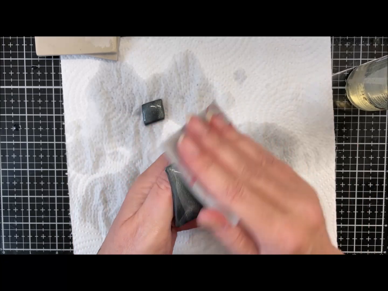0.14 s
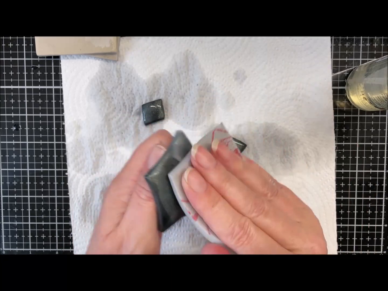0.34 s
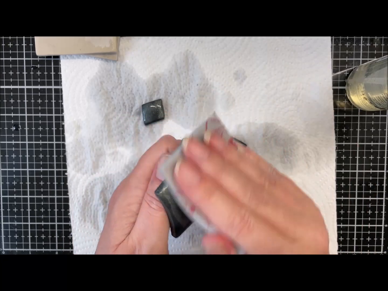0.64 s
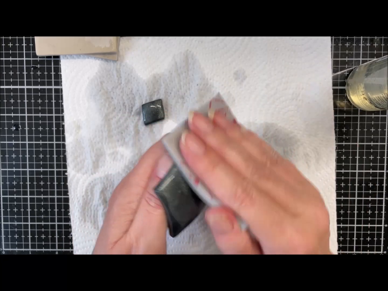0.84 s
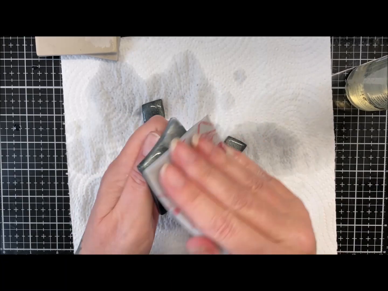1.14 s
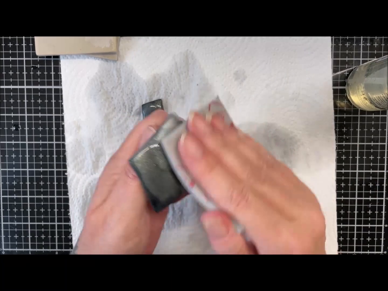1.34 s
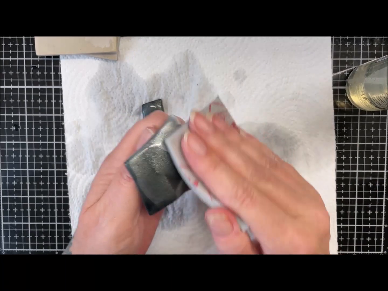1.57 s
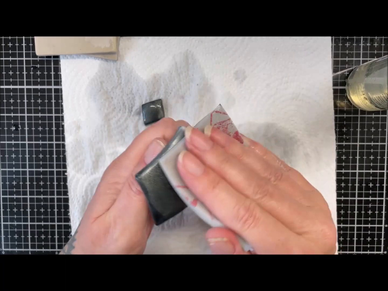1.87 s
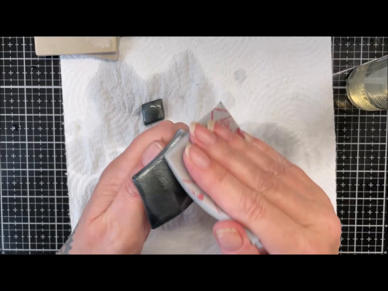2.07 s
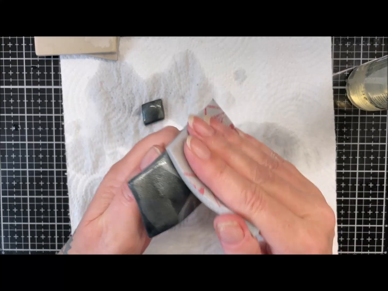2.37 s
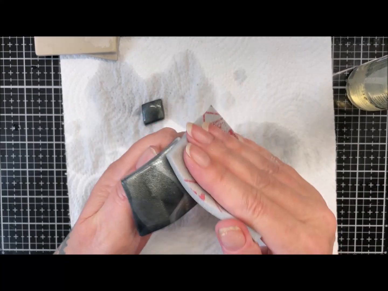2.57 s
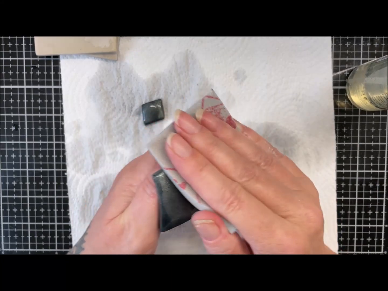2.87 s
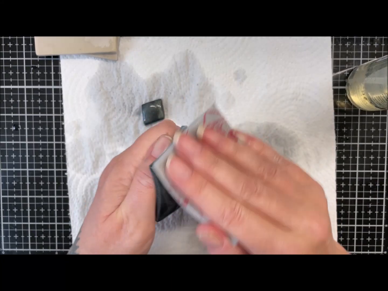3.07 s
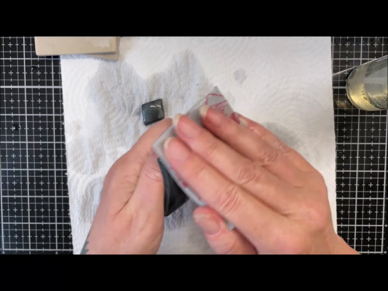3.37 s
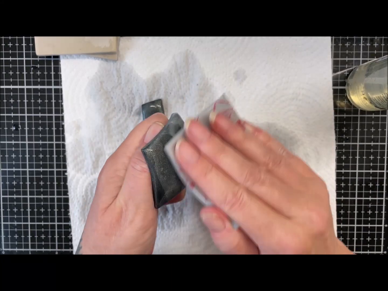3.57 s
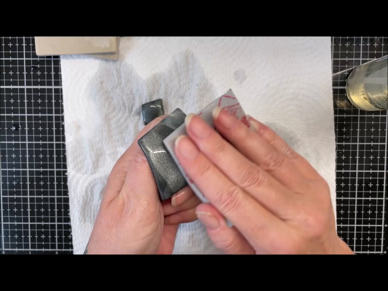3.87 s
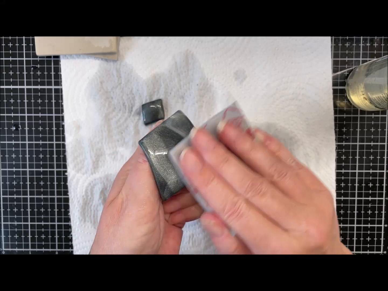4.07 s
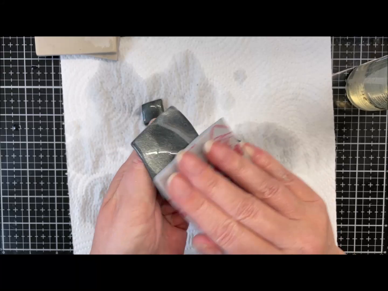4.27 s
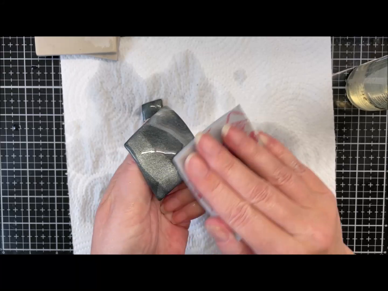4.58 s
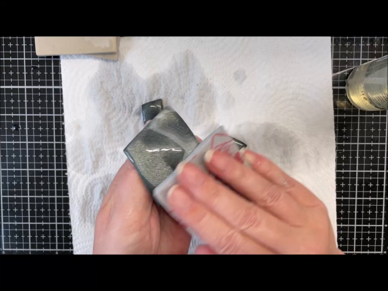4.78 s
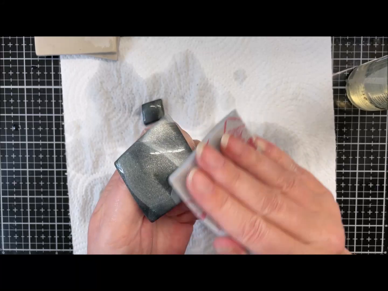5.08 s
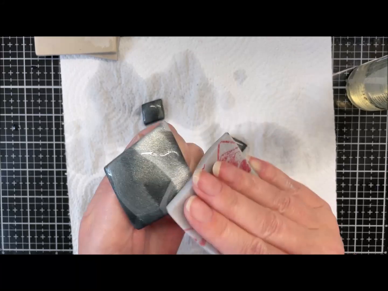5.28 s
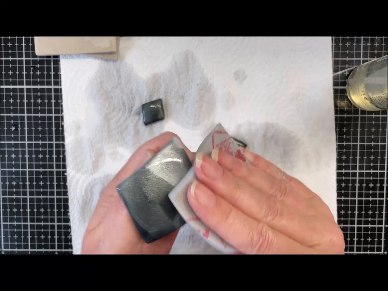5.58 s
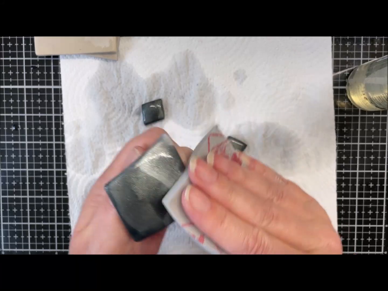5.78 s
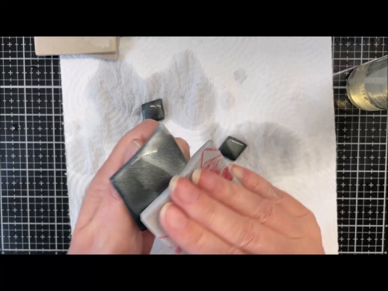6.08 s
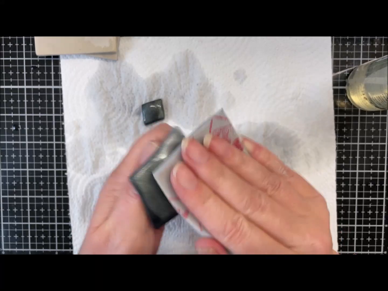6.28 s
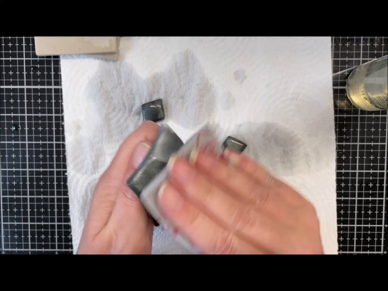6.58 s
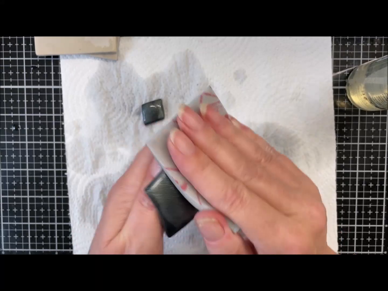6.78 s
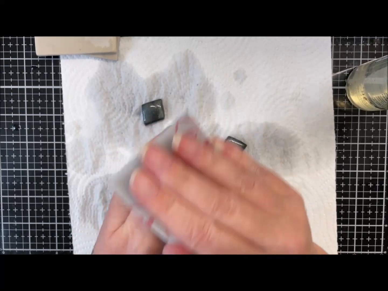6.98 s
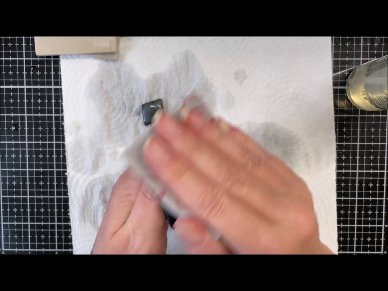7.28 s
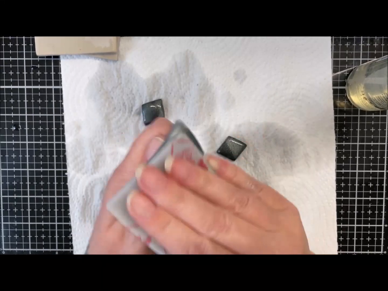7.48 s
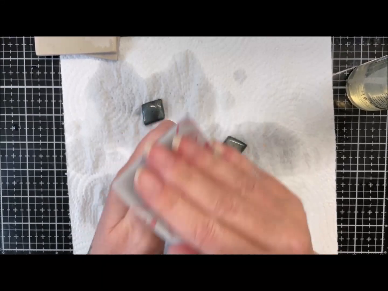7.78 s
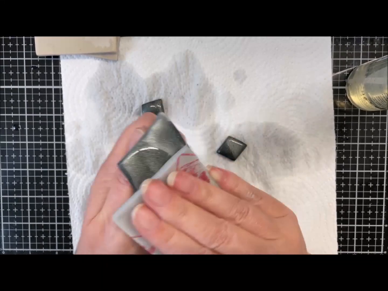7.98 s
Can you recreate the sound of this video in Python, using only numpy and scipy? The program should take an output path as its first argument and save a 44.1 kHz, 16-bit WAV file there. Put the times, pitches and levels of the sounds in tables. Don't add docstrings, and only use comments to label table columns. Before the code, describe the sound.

Sanding begins almost at once and continues to the end at about 8 seconds: a foam-backed abrasive pad rubbed quickly over a hard clay piece, about eight strokes a second. From 0 to 2 s the strokes circle and run together as a fluttering, raspy hiss, with a heavier scrape near 0.3 s. Around 2 to 2.4 s it grows louder, lower and coarser, then strokes separate with short dips, becoming lighter near 3 s. From 4 to 6 s it is a crisp, regular back-and-forth, thin and bright at first, most strongly chopped and firmer around 5.5 s. After 6.1 s it blends into smoother, even circling. Faint dull thuds and small hollow pops occur near 1, 3.1, 5.1, 5.6, 6.3 and 7.2 s. Beneath lie deep mains hum and soft room rumble. Close, mostly dry phone pickup from above, with slightly grainy treble.

```python
import sys
import numpy as np
from scipy import signal
from scipy.fft import rfft, irfft
from scipy.io import wavfile
from scipy.ndimage import uniform_filter1d

SR = 44100
rng = np.random.default_rng(int(sys.argv[2]) if len(sys.argv) > 2 else 0)


def wav_out(sig):
    wavfile.write(sys.argv[1], SR, np.round(np.clip(np.atleast_2d(sig).T, -1, 1) * 32767).astype(np.int16))


def to_linear_factor(level_db):
    exponent = np.asarray(level_db, float) / 20
    return 10 ** exponent


N = 358533
T = np.arange(N) / SR
HZ = np.fft.rfftfreq(N, 1 / SR) + 1e-3
STEP = 128

# (start [s], stop before it [dB], pressure [dB], gap pitch [semitones], swell over the stroke [dB])
FIRST_CIRCLES = [(0.05, -3.5, -63, 4, 0), (0.19, 15, -60.5, 3.5, -4.0), (0.29, -3, -54.5, -1.5, -11.5),
                 (0.464, 7, -58, -7.5, 4), (0.572, 17, -61.0, 3.5, -1), (0.689, 8.5, -59.5, 5.5, -2.0),
                 (0.778, 3, -60, 3.4, -3), (0.88, -0.5, -60.5, 4.5, -9), (1.008, 2.5, -58.5, -1.2, -5),
                 (1.1, -0.5, -59, 4.5, -7), (1.242, 3, -59.0, 3.0, 2), (1.36, -3, -60, 5.5, -3.0),
                 (1.485, 6.5, -58, -0.3, -2), (1.6, 4, -60, 4.5, -6), (1.702, 3, -56, -1.5, -3),
                 (1.82, 0, -57.0, -0.2, -6), (1.941, -2.5, -54.5, -2.4, 2)]
STROKES_ON_EDGE = [(2.093, 4, -58.5, 0, -11), (2.204, 14, -55.5, -2.5, -10), (2.277, 2.7, -54, -3.5, -4),
                   (2.41, 3.8, -57.5, -2.5, -3), (2.556, 16, -60.0, 0.2, -12),
                   (2.667, 20.0, -60.5, -1.5, -4), (2.803, 27, -59, -0.5, -12),
                   (2.898, 2.4, -61.0, -2.5, 2), (3.018, 4.8, -61, 1.5, -3), (3.142, 7.5, -65, 2.2, 13),
                   (3.28, 1.3, -62, 4, -8), (3.432, 7.6, -57.5, 1.4, 6), (3.532, 3.4, -60, 3, -12.5),
                   (3.698, 10, -59.5, 2, 1), (3.857, 5.0, -63.5, 3.5, -13), (3.969, 10, -61, 3.5, 0)]
STROKES_ON_FACE = [(4.095, 17, -63.0, 6, -9), (4.218, 14, -60.5, 2, 1), (4.331, 13, -61.0, 2.5, -7),
                   (4.459, 10, -59.5, 3.9, -6), (4.584, 17, -59, 2, -8), (4.72, 20.0, -60.5, 2.5, -4.0),
                   (4.84, 8, -63, 2.5, -5), (4.959, 3.6, -60.0, 2.0, 9), (5.114, 4.2, -62.5, 3, -9),
                   (5.264, 4.9, -58.0, -1, 16), (5.39, 12, -58.5, 0, 2.0), (5.53, 33, -55.5, -0.0, 2),
                   (5.655, 25, -56.5, 0.2, -3), (5.781, 20.0, -56.0, 0, 4), (5.92, 20, -57.5, -1, -19.5),
                   (6.05, 15, -57.5, 1.5, -2.0)]
LAST_CIRCLES = [(6.156, 1.5, -59.5, -0.5, -3), (6.281, -1.5, -60.5, 3, -4), (6.41, 1.5, -58.5, 0.5, 1.5),
                (6.57, 2.0, -61, 2.5, -8.5), (6.685, -0.5, -59, 0.5, 5), (6.82, 0, -60.5, 4.5, -4.5),
                (6.954, 1.5, -60.0, 0.7, 13.5), (7.07, 0.5, -59.0, 4.5, 0.5), (7.204, 4.5, -60.5, 2, 9),
                (7.35, -0.5, -60.0, 3.2, -1), (7.488, -2, -59.5, 2.1, 7.5), (7.63, 0, -58.5, 4.5, -8),
                (7.792, 2.5, -59, 0.9, 1.5), (7.92, 0, -62, 4, -4.5), (8.042, 0, -61.5, 3.3, 8)]
BOUTS = [FIRST_CIRCLES, STROKES_ON_EDGE, STROKES_ON_FACE, LAST_CIRCLES]


def curve(table, t):
    s, *columns = np.transpose(table)
    return [np.interp(t, s, c) for c in columns]


def colour(points):
    hz, db = np.transpose(points)
    return to_linear_factor(np.interp(np.log(HZ), np.log(hz), db))


def peaks(modes):
    return sum(weight / (1 + (2 * (HZ - hz) / width) ** 2) for hz, width, weight in modes)


def unit(x):
    return x / np.sqrt(np.mean(x ** 2))


def smooth_twice(x, size, axis=-1):
    return uniform_filter1d(uniform_filter1d(x, size, axis=axis), size, axis=axis)


def walk(rate):
    hold = int(SR / rate)
    levels = np.repeat(rng.standard_normal(1000), hold)[:N]
    return unit(smooth_twice(levels, hold))


def grit_clicks(scatter_db=1.1):
    # (frequency [Hz], level [dB per Hz])
    grit_colour = [(400, -8), (800, -8.5), (1300, -7.5), (1600, -11), (1830, -4), (2870, -0.5), (3090, -5),
                   (3370, -3), (4460, -3.5), (5710, -3.5), (7080, -5), (8050, -5), (11500, -8.5),
                   (15700, -10)]
    # (frequency [Hz], width [Hz], gain [dB])
    piece_modes = [(1860, 14, 4.5), (2218, 190, 3.5), (2435, 88, 3), (2740, 36, 7), (2966, 46, 7),
                   (3260, 99, 6), (3435, 90, 8), (3615, 120, 1), (3867, 38, 9.5), (4140, 68, 5.5),
                   (5390, 1200, 1.5), (6200, 310, -3), (7190, 64, -5), (7210, 190, 5), (8960, 200, 2.5)]
    size_db = scatter_db * np.minimum(rng.exponential(size=N), 5)
    grit = rng.standard_normal(N) * to_linear_factor(size_db)
    spectrum = rfft(grit) * colour(grit_colour) * to_linear_factor(peaks(piece_modes))
    in_zone = (HZ > 2500) * (HZ < 4400)
    spectrum /= np.std(irfft(spectrum * in_zone, N))
    return irfft(spectrum, N)


def sanding():
    # (centre [Hz], usual level [dB], share of the turn depth [1])
    zones = [
        (2150, -65, 0.79),
        (3300, -58, 0.97),
        (6320, -58.5, 1.11),
        (12300, -63.5, 0.98),
    ]
    # (pressure [dB/dB], swell [dB/dB], bite [dB/dB], opening [dB/dB],
    # palm weight [dB/dB], gap [dB/semitone], more on a pull [dB], more in mid stroke [dB])
    follow = [
        (0.56, 1.3, -0.44, 0.13, .99, -0.06, .1, 0.35),
        (0.81, 0.72, .01, 0.0033, 0.31, 0.04, 0.34, 1),
        (.51, .3, 0.87, .01, -.1, 0.6, 0.3, 0.4),
        (0.58, 0.23, 0.29, 0.84, -0.74, 0.46, -0.7, 0.5),
    ]
    # (time [s], bite of the grit [dB], opening toward the phone [dB],
    # upper gap [Hz], cupping [dB], weight of the palm [dB])
    grip = [(0.1, 1, 0, 6400, 8, 2), (0.33, 1.5, 2, 5900, 2.5, -0.6), (0.6, -3, -0.5, 6300, 4, -0.5),
            (1, -2, 1, 6200, 5.5, 0), (1.5, -2, -2, 6200, 4.5, 0.7), (2, -0.5, -4, 5900, 3.5, -1.2),
            (2.5, 0.2, -5.5, 5700, 7, -3), (3, 0, 0.5, 6260, 4, 1.9), (3.3, 0, -3, 6240.0, 7, 1),
            (3.8, 1.5, -1, 6270, 3, 1.8), (4.3, 2, 0.5, 6850, 4.5, 2), (4.8, -0.5, 0, 6850, 6.5, 0.6),
            (5.1, -3, -2.5, 6180.0, 3.5, 1.5), (5.4, 1, -3, 6480.0, 5, 1.3),
            (5.9, 0.5, -1.8, 6270, 9.5, -2), (6.3, -0.9, 0.8, 6300, 6, 0.8),
            (7.2, -1.8, 0.5, 6500, 6, -0.1), (8.0, -2.5, 0, 6300, 5, -1.6)]
    size, overlap = 4 * STEP, 3 * STEP
    hz, s, cells = signal.stft(grit_clicks(), SR, nperseg=size, noverlap=overlap)
    octave = np.log2(hz + 1)[:, None]
    pressure_db, swell_db, gap, pull, speed = strokes(s)
    bite_db, opening_db, upper_hz, cup_db, palm_db = curve(grip, s)
    zone_hz, usual_db, share = np.transpose(zones)
    pressure_db = pressure_db - usual_db[1]

    hand = [pressure_db, swell_db, bite_db, opening_db, palm_db, gap, pull, speed]
    lost_db = turns()[np.minimum((s * SR).astype(int), N - 1)]
    change_db = np.array(follow) @ hand - share[:, None] * lost_db
    index = np.arange(len(zones))
    place = np.interp(octave, np.log2(zone_hz), index)
    db = np.clip(1 - np.abs(place - index), 0, 1) @ change_db

    lower_hz = 2927 * 2 ** (gap / 12)
    lower_db = cup_db + 0.45 * (pressure_db + swell_db)
    db += lower_db * np.exp(-((octave - np.log2(lower_hz)) / .17) ** 2)
    upper_db = 4.0 + 0.48 * bite_db
    db += upper_db * np.exp(-((octave - np.log2(upper_hz)) / .22) ** 2)

    echo_spacing_hz = 1804
    db += 0.55 * np.maximum(bite_db, 0) * np.cos(2 * np.pi * hz[:, None] / echo_spacing_hz)

    db += 2.63 * patches(db.shape, lines=2, steps=6)
    db += 1.3 * patches(db.shape, lines=1, steps=40)
    db += .8 * patches(db.shape, lines=10, steps=12)
    hiss = signal.istft(cells * to_linear_factor(db), SR, nperseg=size, noverlap=overlap)[1][:N]
    return hiss * to_linear_factor(usual_db[1] - 2.0)


def strokes(t):
    gap_glide_semitones, blend_s = 1, 0.032
    start, _, pressure_db, gap, swell_db = np.concatenate(BOUTS).T
    pull = np.concatenate([np.arange(len(bout)) % 2 for bout in BOUTS])
    along = np.interp(t, np.append(start, N / SR), np.arange(len(start) + 1))
    k = np.minimum(along.astype(int), len(start) - 1)
    lean = along - k - .5
    held = [
        pressure_db[k],
        swell_db[k] * lean,
        gap[k] + gap_glide_semitones * lean,
        pull[k] - .5,
        np.cos(2 * np.pi * lean),
    ]
    return uniform_filter1d(held, int(blend_s * SR / STEP), axis=1)


def turns(slowing_shape=1.73, bite_shape=2.7):
    slowing_ms, rest_ms = (20.6, 10.8), (2, 0.46)
    bite_ms = 12.3
    touch_s, touch_db_per_s = 0.083, 350
    lost = touch_db_per_s * np.maximum(touch_s - T, 0)
    for bout in BOUTS:
        for k, (s, depth_db, *_) in enumerate(bout):
            near = slice(max(int((s - .1) * SR), 0), int((s + .1) * SR))
            ms = (T[near] - s) * 1000
            slowing = np.maximum(-ms - rest_ms[k % 2], 0) / slowing_ms[k % 2]
            biting = np.maximum(ms, 0) / bite_ms
            lost[near] += depth_db * 2. ** -(slowing ** slowing_shape + biting ** bite_shape)
    return lost


def patches(shape, lines, steps):
    field = rng.standard_normal(shape)
    field = smooth_twice(field, lines, axis=0)
    return unit(smooth_twice(field, steps, axis=1))


def walls(x):
    t60_s, tail_db = 0.21, -9.5
    t = T[:SR // 2]
    tail = rng.standard_normal(len(t)) * to_linear_factor(-60 * t / t60_s) * (t > .002)
    tail /= np.sqrt(np.sum(tail ** 2))
    return x + to_linear_factor(tail_db) * signal.fftconvolve(x, tail)[:N]


def knocks():
    # (time [s], level [dB], pitch [Hz], pitch wander [Hz], length [s])
    short_bursts = [(.12, -66, 340, 40, .25), (.34, -64, 1400, 300, .15), (1.042, -58, 300, 50, .035),
                    (1.55, -66, 330, 50, .2), (3.07, -62, 755, 10, .035), (5.1, -62, 845, 10, .035),
                    (5.635, -60, 755, 10, .035), (5.825, -62, 755, 10, .035), (6.27, -58, 320, 20, .04),
                    (6.33, -64, 330, 30, .12), (7.197, -59, 725, 10, .035), (7.3, -65, 345, 25, .45)]
    out = np.zeros(N)
    for s, db, hz, wander_hz, length in short_bursts:
        near = slice(max(int((s - 2 * length) * SR), 0), int((s + 2 * length) * SR))
        phase = 2 * np.pi * np.cumsum(hz + wander_hz * walk(120)[near]) / SR
        out[near] += to_linear_factor(db) * np.sin(phase) * np.exp(-(2 * (T[near] - s) / length) ** 2)
    return out


def arm_sway():
    # (frequency [Hz], width [Hz], level [dB])
    arm_modes = [
        (4, 1.83, -5.5),
        (8.3, 0.78, 1.5),
        (16.5, 3.45, -11),
    ]
    # (time [s], level [dB])
    jolts = [(.36, -39), (1.54, -43.5), (2.24, -38), (2.74, -39.5), (3.14, -31), (3.55, -41), (3.78, -38),
             (4.26, -45.5), (4.6, -33), (5.02, -37), (5.3, -42), (5.95, -31), (6.29, -45), (6.5, -40),
             (6.93, -53), (7.5, -58)]
    sway_db, jolt_s = -40.5, 0.08
    power = peaks([(hz, width, to_linear_factor(2 * db)) for hz, width, db in arm_modes])
    shake = np.sqrt(power) * (HZ > 1) / (1 + (HZ / 21) ** 8)
    sway = irfft(rfft(rng.standard_normal(N)) * shake, N)
    sway /= np.sqrt(uniform_filter1d(sway ** 2, SR // 3))
    t = T[::STEP]
    level = to_linear_factor(sway_db) + sum(to_linear_factor(db) * np.exp(-((t - s) / jolt_s) ** 2) for s, db in jolts)
    return sway * np.interp(T, t, level)


def bands(spectrum, low_hz, count, octaves):
    for k in range(count):
        hz = low_hz * 2 ** (k * octaves)
        away = np.clip(np.log2(HZ / hz) / octaves, -1, 1)
        yield hz, irfft(spectrum * np.cos(np.pi / 2 * away) ** 2, N)


def room_air():
    # (frequency [Hz], level [dB per Hz])
    air_colour = [(20, -6), (28, -27.5), (41, -5), (55, -25.5), (72, -17), (92, -31), (118, -26),
                  (135, -29.5), (165, -28), (274, -40), (582, -44.5), (729, -40.5), (1360, -45.5),
                  (1700, -55)]
    air = rfft(rng.standard_normal(N)) * colour(air_colour) * (HZ > 20) / (1 + (HZ / 2600) ** 4)
    out = np.zeros(N)
    for hz, band in bands(air, 15.7, count=10, octaves=1.0):
        flicker_db = 2.0 if 250 < hz < 1000 else .7
        out += band * to_linear_factor(flicker_db * walk(6))
    return unit(out) * to_linear_factor(-50)


def hum():
    # (frequency [Hz], level [dB], flicker [dB])
    tones = [(49.9, -47.8, .4), (191, -79, 1.1), (250.5, -80, 1.1), (316, -74.5, 1.8), (351, -79, 2.5),
             (474, -80.5, 1.5), (632, -81, 1.5)]
    out = np.zeros(N)
    for hz, db, flicker_db in tones:
        out += to_linear_factor(db + flicker_db * walk(1.8)) * np.sin(2 * np.pi * (hz * T + rng.random()))
    return np.sqrt(2) * out


def microphone_hiss():
    return to_linear_factor(-79) * rng.standard_normal(N)


def scene():
    return (walls(sanding()) + knocks() + arm_sway() + room_air() + hum() + microphone_hiss())[None]


def starve(x, low_hz=350, coarse_hz=500, follow=.33):
    # (time [s], share of lines kept [1])
    starved = [(.048, .06), (.627, .07), (1.736, .07), (2.376, .05), (2.548, .04), (2.952, .05),
               (3.273, .08), (3.955, .05), (4.531, .07), (4.957, .06), (5.918, .02), (5.961, .05),
               (6.11, .08), (6.28, .06), (6.686, .06), (7.134, .07), (7.198, .07), (7.475, .03),
               (7.496, .04), (7.56, .05), (7.646, .06), (7.797, .06), (7.923, .07), (8.008, .07)]
    frame_s, frame_lag = 1024 / 48000, .39
    half = round(frame_s * SR)
    n, k = np.arange(2 * half) + .5, np.arange(half) + .5
    window = signal.windows.kaiser_bessel_derived(2 * half, 3 * np.pi)
    cosines = np.cos(np.pi / half * np.outer(n + half / 2, k))
    basis = window[:, None] * cosines * np.sqrt(2 / half)
    thinned = k * SR / 2 / half > low_hz
    out = x.copy()
    for s, share in starved:
        frame = round(s / frame_s - frame_lag) + frame_lag
        start = round(frame * frame_s * SR) - half
        near = slice(start, start + 2 * half)
        lines = thinned * (out[near] @ basis)
        step = uniform_filter1d(lines ** 2, size=60) ** (follow / 2) + 1e-9
        step *= 1 + (coarse_hz * 2 * half / SR / k) ** 2
        step *= np.quantile(np.abs(lines) / step, 1 - share) * 3 / 2
        kept = step * np.sign(lines) * np.floor(np.abs(lines) / step + 1 / 3)
        out[near] += basis @ (kept - lines)
    return out


def low_pass(x):
    return signal.sosfilt(signal.butter(12, 15840, fs=SR, output="sos"), x)


def record(dry):
    mix = starve(dry[0])[None]
    return low_pass(mix)


dry = scene()
out = record(dry)
wav_out(out)
```